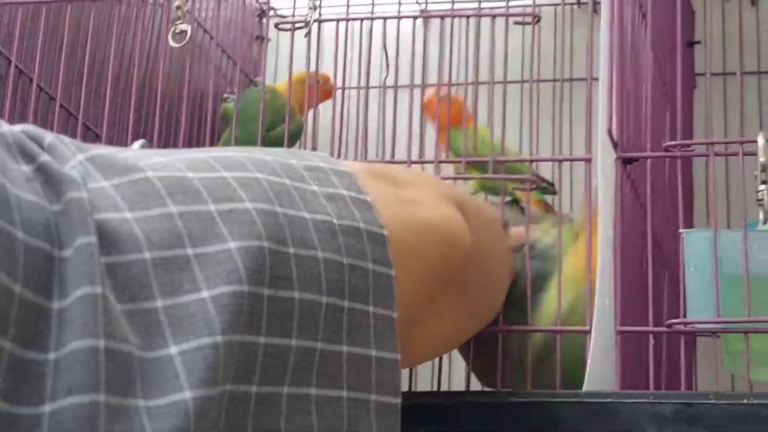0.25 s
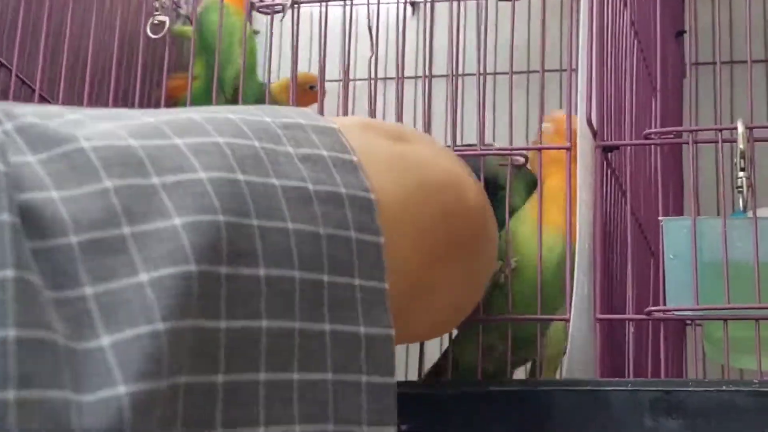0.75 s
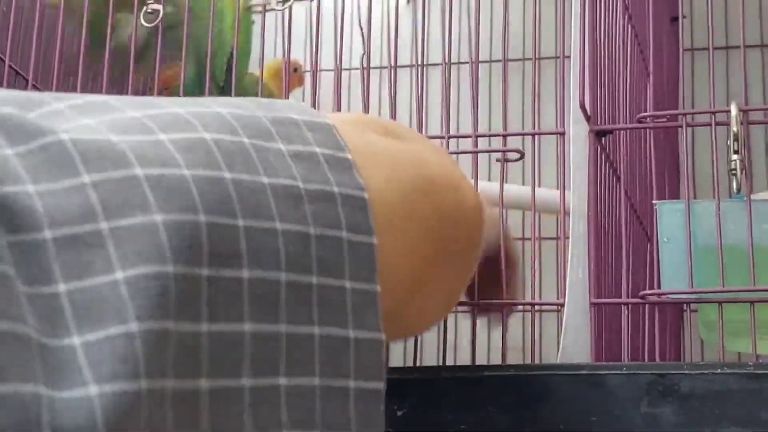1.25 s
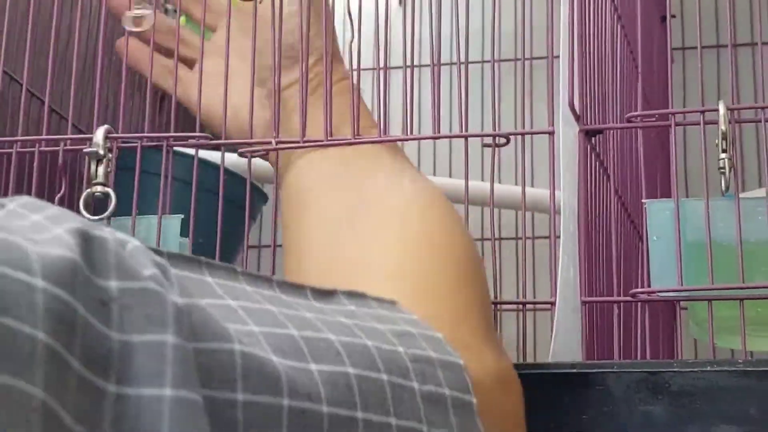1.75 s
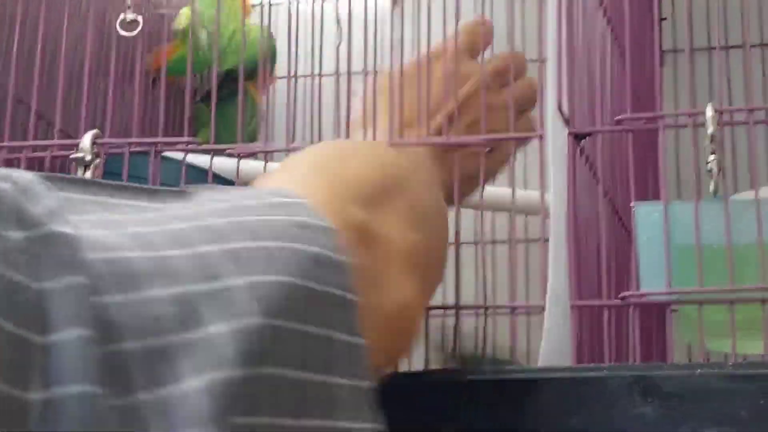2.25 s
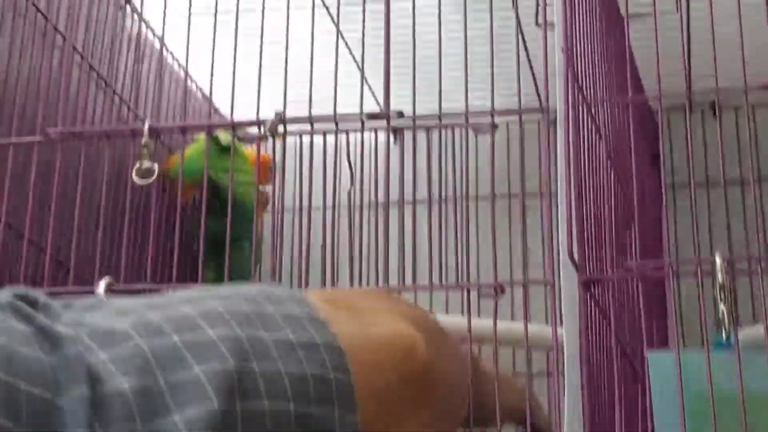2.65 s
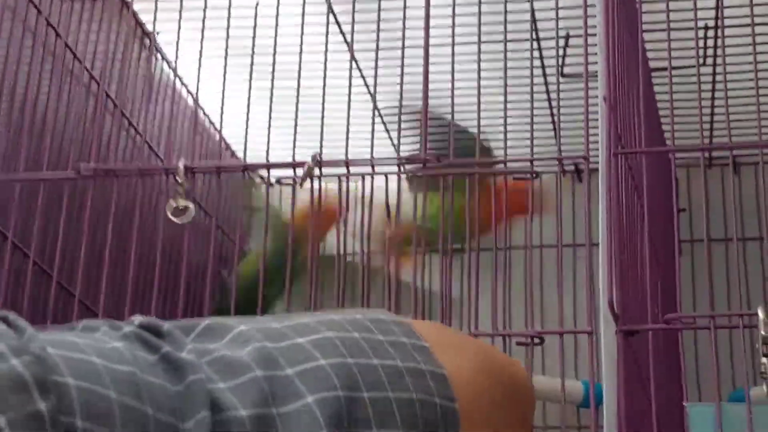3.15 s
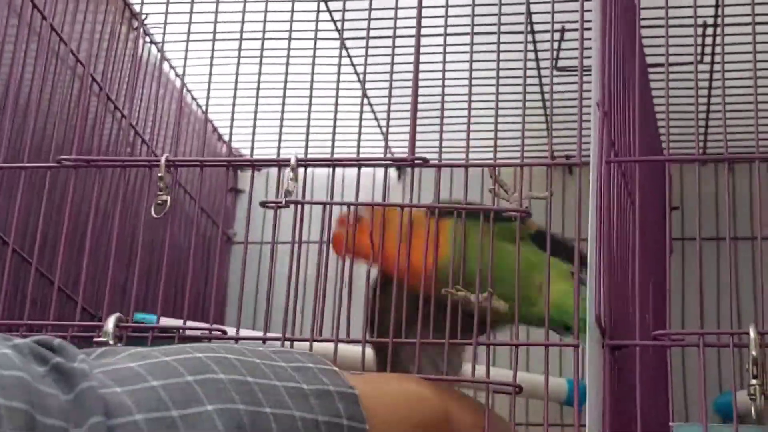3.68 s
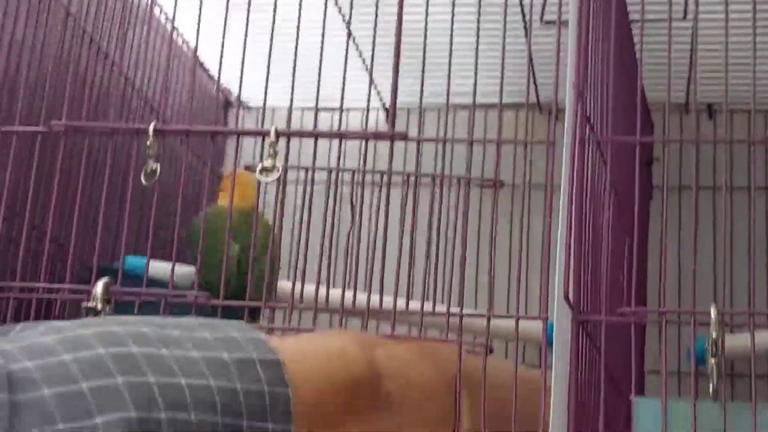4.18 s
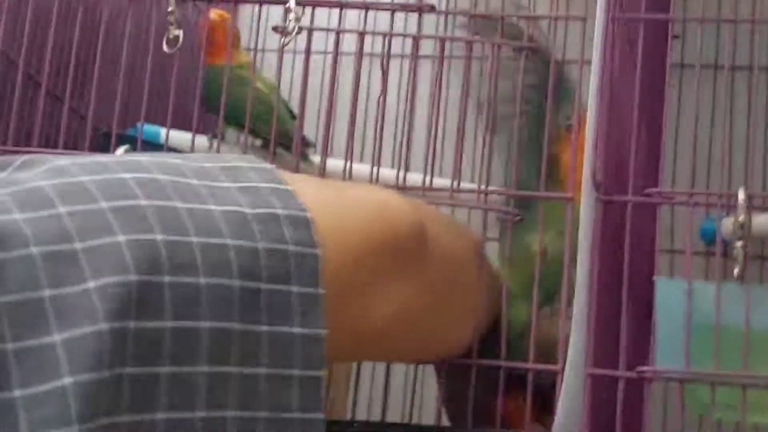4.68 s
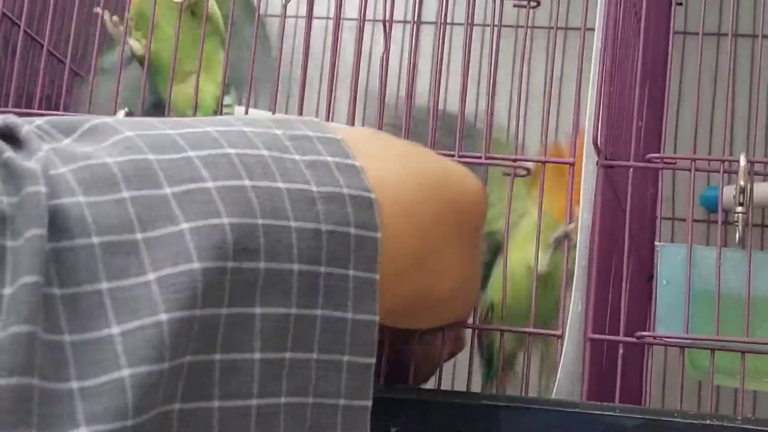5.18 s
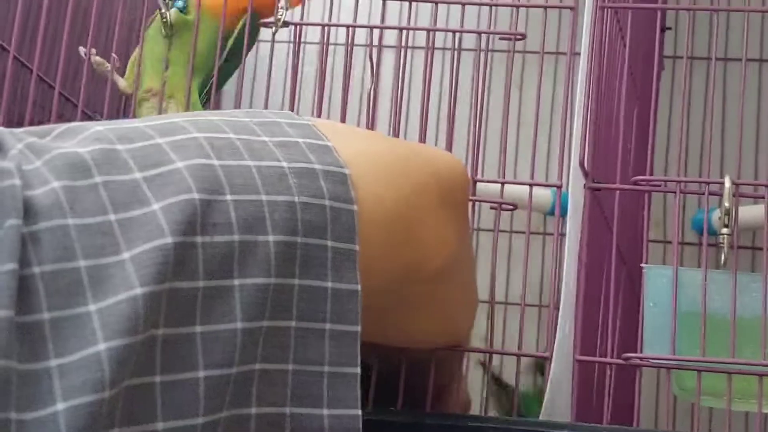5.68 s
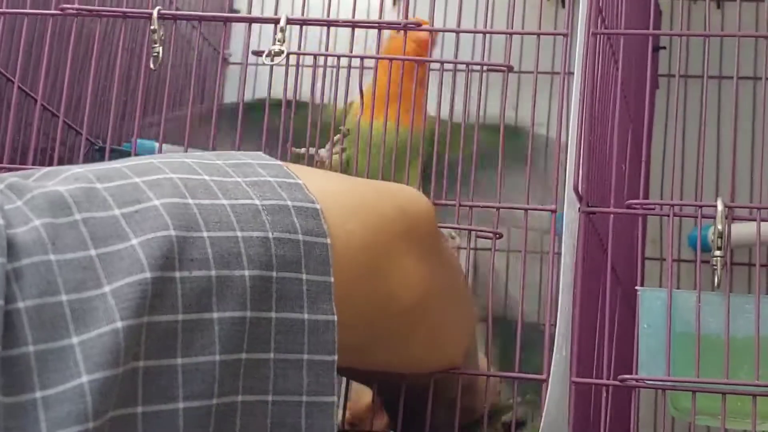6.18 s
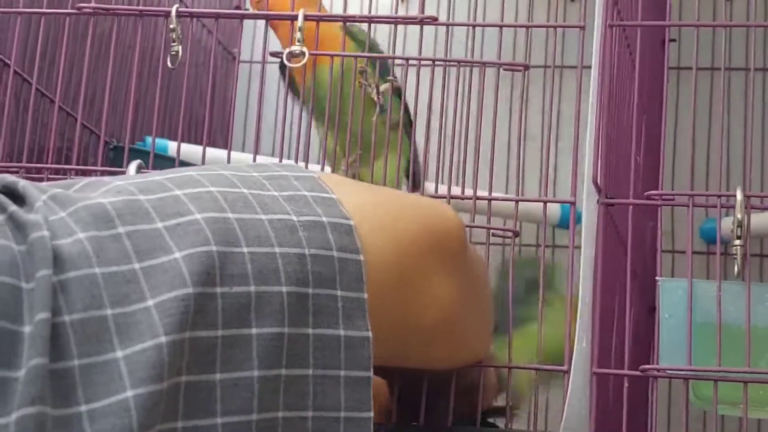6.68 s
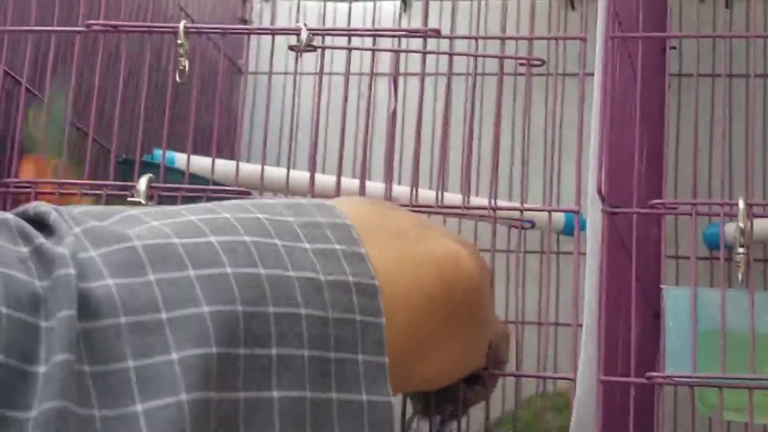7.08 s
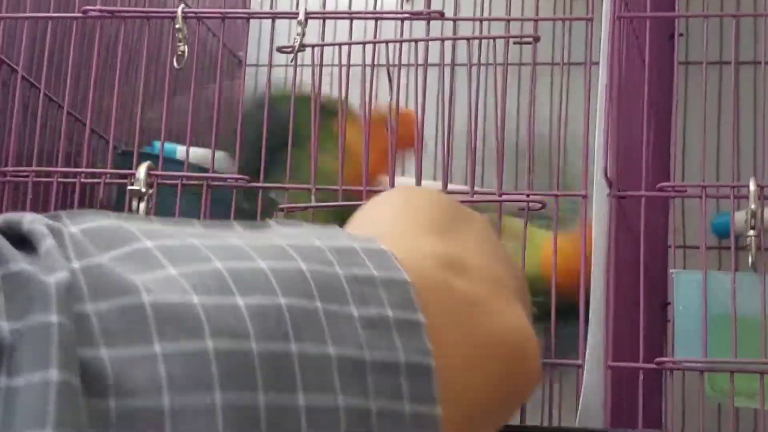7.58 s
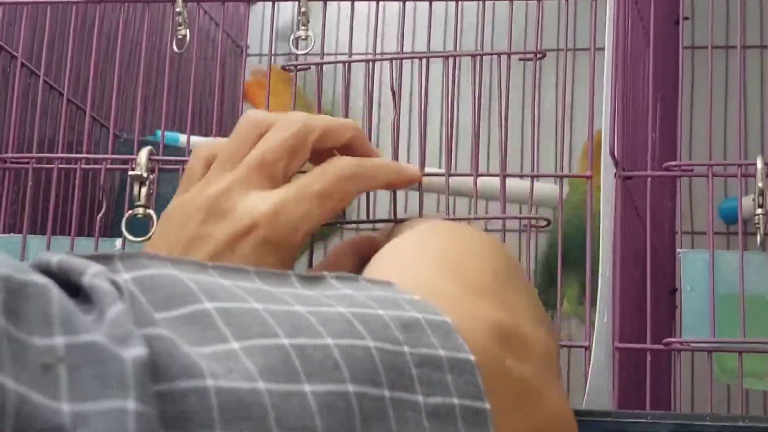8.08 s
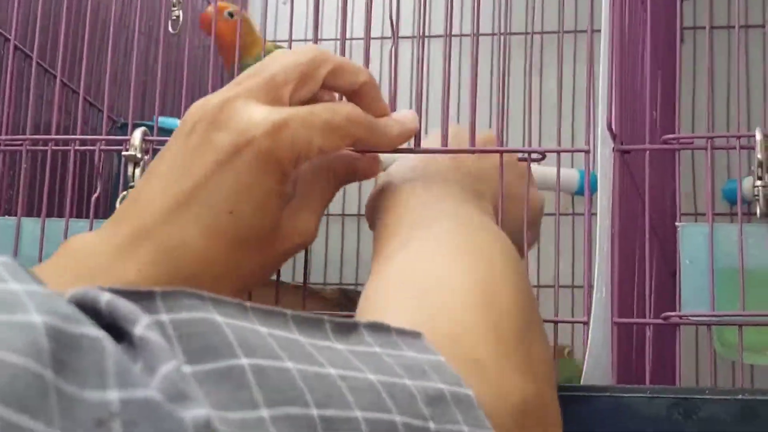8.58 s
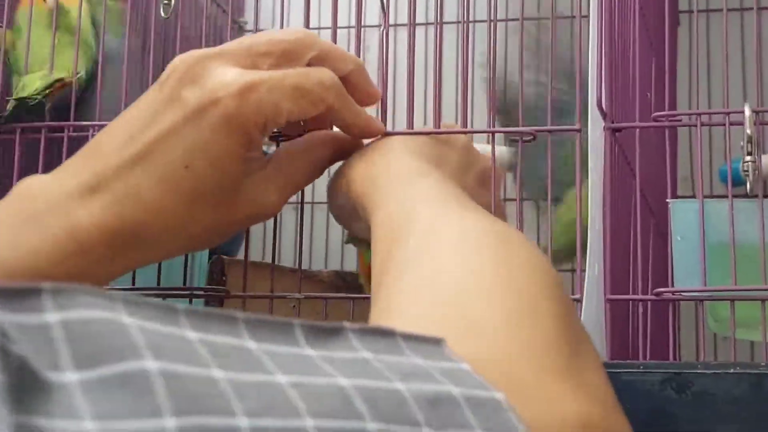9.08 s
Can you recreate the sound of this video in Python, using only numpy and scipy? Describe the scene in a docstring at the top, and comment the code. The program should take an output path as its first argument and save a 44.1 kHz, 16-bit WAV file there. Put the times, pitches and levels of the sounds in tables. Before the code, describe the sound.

Small parrots flap and screech in a wire cage for about nine seconds, heard close by in a small, hard room with brief reverberation. Wings flutter from the start in bursts of puffing air and feather rustle, strongest around 0, 3.2, 4.7, 6.3 and 7.7 seconds. Each screech is a short rasp breaking into a rising cry that drops off. They come irregularly at first, then about twice a second from 4.8 seconds to the end. Quick, high chirps cluster between 2.1 and 2.4 seconds, with single ones near 4 and 8.3. Wing tips brush the bars in rapid runs between 1.2 and 1.9 seconds and around 3.5. Claws, beaks and bodies strike the cage throughout with ticks, rattles and ringing thuds, sharpest near 4, 4.8, 6.3 and 6.8 seconds. Underneath, an engine idling outside hums low, fading after 4 seconds and returning faintly at the end.

```python
"""A small hard room, where lovebirds screech and flap about a wire cage as a hand tries to catch one.
Each call is a harmonic buzz of the syrinx, chopped into bursts and filtered by throat and beak.
Wings push puffs of air, rub their feathers and brush the bars; claws, beaks and bodies strike the
cage and excite its modes. All this reverberates briefly, over the hum of an engine idling outside."""
import sys
import numpy as np
from scipy import signal
from scipy.fft import rfft, irfft
from scipy.io import wavfile
from scipy.ndimage import uniform_filter1d

SR = 44100
rng = np.random.default_rng(int(sys.argv[2]) if len(sys.argv) > 2 else 0)


def unload_audio(sound):
    """Save the sound as a 16-bit wav file, at the path given as the first command line argument."""
    columns = np.transpose(np.atleast_2d(sound))
    # keep every value between -1 and 1, then stretch to whole-number steps
    steps = np.round(np.clip(columns, -1, 1) * 32767)
    wavfile.write(sys.argv[1], SR, steps.astype(np.int16))


N = 411894
TIME = np.arange(N) / SR

# firing rate of the engine: t/s, f/Hz
FIRING_RATE = [(1.4, 21.6), (3.2, 21.3), (4.3, 21.2), (9.3, 20.4)]
# loudness of the engine: t/s, level/dB
ENGINE_LEVEL = [(0, -36.5), (.8, -42), (1.2, -38), (3.72, -30.5), (4.39, -51.5), (9.05, -60), (9.34, -44)]
# exhaust orders: multiple of the firing rate, level/dB
EXHAUST_ORDERS = [(3, 0.5), (4, -21), (6, -11), (10, -15), (12, -24)]
# bouts of flapping: t/s, duration/s, air level/dB, feather level/dB
FLAP_BOUTS = [(0.011, 0.25, -34.5, -33.5), (.45, 0.17, -47.5, -48), (1.0, 0.54, -44.5, -46.5),
              (1.648, 0.67, -39, -39.5), (2.615, 0.048, -37.5, -36.5), (3.149, 0.49, -34.5, -34.5),
              (3.327, 0.047, -29, -30.5), (3.79, 0.35, -38.5, -39.5), (4.652, .38, -37, -36),
              (5.09, 0.46, -38.5, -37), (5.7, 0.66, -50.5, -45.5), (6.28, 0.77, -38.5, -37),
              (7.27, 0.27, -38.5, -37.5), (7.643, .19, -36.5, -36), (8.078, 0.082, -37.5, -31.5),
              (8.401, 0.21, -51.5, -49), (8.898, .22, -36.5, -37.5)]
# spectrum of pushed air and of thuds: f/Hz, level/dB
AIR_SPECTRUM = [(35, -15.5), (60, -24), (92, -6), (179, -4), (298, -3), (484, -6.5), (660, -11.5),
                (715, -17), (1500, -25.5), (1950, -58), (3300, -120)]
# spectrum of feather friction: f/Hz, level/dB
FEATHER_SPECTRUM = [(400, -1.5), (1000, -2), (2000, -1.5), (4500, -9), (7000, -11.5), (10000, -11.5),
                    (13000, -8.5), (16000, -8)]
# claws, beaks and bodies hitting the cage: t/s, tick level/dB, thud level/dB
IMPACTS = [(0.029, -28, -31), (.315, -32, -29.5), (0.651, -30.5, -42.5), (1.0368, -20, -31.5),
           (1.661, -24, -34.5), (2.0431, -21, -37), (2.267, -23, -44), (2.623, -26.5, -33),
           (3.8277, -18, -34.5), (3.994, -15, -29), (4.061, -36, -32.5), (4.244, -20.5, -31.5),
           (4.662, -30.5, -31), (4.792, -17, -27.5), (4.92, -25, -26), (5.3968, -20.5, -34),
           (6.085, -32, -51), (6.1579, -23, -41), (6.305, -16.5, -31.5), (6.76, -26, -31),
           (6.819, -17.5, -29.5), (7.407, -22.5, -31.5), (7.707, -20, -23), (8.101, -21, -34),
           (8.24, -21, -31), (8.83, -21, -32), (8.8828, -21.5, -36), (8.972, -19.5, -33)]
# spectrum of a tick on wire: f/Hz, level/dB
TICK_SPECTRUM = [(600, -4.5), (1500, -1.5), (4500, -5), (7000, -8), (12000, -7), (16000, -4)]
# modes of bars and tray: f/Hz, level/dB, T60/s
CAGE_MODES = [(223.4, -2.5, 0.43), (298, -8, 0.11), (487, -8, 0.081), (1010, -3.5, 0.13),
              (1845, 3.5, 0.087), (4280, -9.5, 0.18), (4840, -3.5, .1)]
# screeches: t/s, rasp/s, climb/s, drop/s, top f/Hz, end f/Hz, rasp level/dB, cry level/dB,
# roughness of the cry, treble gain/dB
SCREECH_CALLS = [ (.036, .034, 0.079, .033, 2862, 2595, -11, -12.5, 0.62, -2),
                 (0.334, .02, 0.098, 0.035, 3160, 2606, -20.5, -13, 0.77, -1),
                 (1.044, 0.0017, .044, 0.012, 2607, 2540, -24.5, -19, 0.67, -4),
                 (1.674, 0.027, 0.064, .038, 2796, 2150, -17, -15, 0.69, -1.5),
                 (2.61, .076, 0.078, 0.029, 3050, 2010, -17.5, -16, 0.53, 1),
                 (2.933, 0.055, 0.088, 0.042, 2877, 2567, -19.5, -15.5, 0.64, 0.5),
                 (3.218, 0.065, 0.088, 0.026, 2655, 1696, -20, -18, 1.04, 3),
                 (3.85, 0.041, 0.083, 0.035, 2545, 2014, -17, -14, 0.64, 1.5),
                 (4.849, 0.067, 0.058, 0.043, 2665, 2075, -14, -12, 0.71, -0.5),
                 (5.155, 0.025, 0.055, .03, 2478, 2108, -17, -14, 0.56, 0),
                 (5.423, .013, 0.057, 0.023, 2610, 2330, -19, -16, 0.59, -4),
                 (5.786, 0.058, 0.05, 0.036, 2790, 1650, -18, -14, 0.45, -0.5),
                 (6.318, 0.059, 0.069, 0.031, 2760, 2146, -17, -14, .35, -4.5),
                 (6.622, 0.0087, .042, 0.019, 2390, 2125, -14.5, -14.5, .85, -1.5),
                 (6.847, .04, .087, .018, 2786, 2290, -14.5, -12, .62, -2),
                 (7.164, .058, 0.051, 0.034, 2617, 2390, -18.5, -13, 0.6, -1.5),
                 (7.443, 0.029, 0.054, 0.031, 2614, 2420, -18, -13.5, 0.39, -1),
                 (7.845, 0.044, 0.036, 0.059, 2567, 2433, -19, -15, 0.35, -0.5),
                 (8.126, 0.049, .042, .024, 2490, 2077, -19, -15.5, .68, 1),
                 (9.004, 0.069, 0.065, 0.035, 2790, 1645, -15.5, -12, 0.51, -2),
                 (9.312, .06, 0.075, 0.026, 2700, 2200, -18.5, -15, .6, 2)]
# response of throat and open beak: f/Hz, gain/dB
VOCAL_TRACT = [(1000, -31), (1500, 0), (2200, -3), (2800, -1), (3400, 0.5), (4400, -0.5), (5500, -6),
               (6500, -14), (7800, -13), (9600, -17.5), (12500, -10), (16000, -33)]
# chirps: t/s, duration/s, start f/Hz, middle f/Hz, end f/Hz, level/dB, roughness
CHIRP_CALLS = [ (0.67, 0.019, 2750, 2950, 2890, -46, 0.3), (2.065, .03, 2660, 2914, 3130, -20, 0.62),
               (2.093, 0.046, 4060, 4760, 3960, -12, .2), (2.135, .015, 3160, 3140, 2890, -18, 0.2),
               (2.31, .052, 3494, 4416, 3460, -13.5, .28), (2.363, .035, 3280, 4043, 3980, -14.5, 0.23),
               (4.039, 0.028, 5140, 5640, 5600, -15.5, 0.2), (4.74, 0.019, 728, 745, 740, -30, .15),
               (8.254, 0.047, 6080, 6190, 6180, -16, 0.08)]
# wing tips brushing the bars: t/s, strokes, interval/s, level/dB
SLAP_RUNS = [(.985, 1, .06, -31), (1.159, 4, .062, -23.5), (1.497, 3, .065, -25), (1.819, 1, .06, -17.5),
             (1.9363, 1, .06, -26), (3.456, 5, .051, -17.5), (4.051, 1, .06, -14.5), (7.138, 1, .06, -20),
             (7.359, 1, .06, -19.5)]
# reverberation time of the room: f/Hz, T60/s
REVERB_TIME = [(150, 0.29), (1000, 0.32), (5000, 0.28), (14000, 0.26)]

STIR_AIR_DB, STIR_FEATHER_DB = -52, -56.5  # the birds never sit quite still


def amp(db):
    """Amplitude ratio of a level in dB."""
    return 10 ** (np.asarray(db) / 20)


def unit(x):
    """Scales to rms 1."""
    return x / np.sqrt(np.mean(x ** 2) + 1e-20)


def read(points, hz):
    """Interpolates on a log-frequency axis."""
    f, value = np.transpose(points)
    return np.interp(np.log(hz + 1), np.log(f), value)


def colour(x, points, size=2048):
    """Minimum-phase filter through points of f/Hz, gain/dB."""
    log_gain = np.log(amp(read(points, abs(np.fft.fftfreq(size, 1 / SR)))))
    taps = np.fft.ifft(np.exp(signal.hilbert(log_gain).conj())).real[:size // 2]
    filtered = signal.oaconvolve(np.atleast_2d(x), taps[None], axes=1)
    return filtered[:, :x.shape[-1]].reshape(x.shape)


def wobble(count, hz):
    """Low-pass noise of rms 1, up to about hz."""
    f = np.fft.rfftfreq(count, 1 / SR)
    return unit(irfft(rfft(rng.standard_normal(count)) / (1 + (f / hz) ** 4), count))


def pair(count, correlation):
    """Partially coherent noise in two channels."""
    shared = np.sqrt(correlation) * rng.standard_normal(count)
    return shared + np.sqrt(1 - correlation) * rng.standard_normal((2, count))


def add(mix, s, sound):
    """Superposes a stereo sound at time s."""
    part = mix[:, max(round(s * SR), 0):][:, :sound.shape[1]]
    part += sound[:, :part.shape[1]]


def engine(waver_db=1.3):
    """Periodic firing makes a harmonic series; only low exhaust orders pass the walls."""
    firing_hz = np.interp(TIME, *np.transpose(FIRING_RATE)) * (1 + 0.0127 * wobble(N, 6))
    cycles = np.cumsum(firing_hz) / SR
    hum = sum(amp(db + waver_db * wobble(N, 4)) * np.sin(2 * np.pi * (round(k) * cycles + rng.random()))
              for k, db in EXHAUST_ORDERS)
    return hum * amp(np.interp(TIME, *np.transpose(ENGINE_LEVEL))) * amp([[-1], [1]])


def hush(level_db=-47):
    """Stationary background noise, strongest near 100 Hz."""
    spectrum = [(25, -23.5), (100, 5.5), (350, -10), (700, -27), (2000, -31), (6000, -47.5), (16000, -44)]
    return amp(level_db) * unit(colour(pair(N, 1.0), spectrum))


def bouts(start, length, level_db, stir_db, attack_s=0.014, fade_db_per_s=58):
    """Envelope of flapping: each bout rises, holds and decays exponentially to a faint stirring."""
    s = TIME[::64]
    t = s[:, None] - start
    gain = np.clip(t / attack_s, 0, 1) * amp(level_db - fade_db_per_s * np.maximum(t - length, 0))
    return np.interp(TIME, s, np.maximum(gain.max(axis=1), amp(stir_db)))


def wings(beat_hz=15, air_depth_db=3, feather_depth_db=5, grain_db=-2):
    """Amplitude-modulated noise: each stroke displaces air and rubs the feathers together."""
    start, length, air_db, feather_db = np.transpose(FLAP_BOUTS)
    stroke = np.sin(2 * np.pi * np.cumsum(beat_hz * (1 + 0.192 * wobble(N, 4.16))) / SR)
    air = unit(colour(pair(N, 0.79), AIR_SPECTRUM) * amp(air_depth_db * stroke))
    air *= bouts(start, length, air_db, STIR_AIR_DB)
    friction = pair(N, 0.047) * amp(feather_depth_db * stroke + grain_db * wobble(N, 400))
    rustle = unit(colour(friction, FEATHER_SPECTRUM))
    return air + rustle * bouts(start, length, feather_db, STIR_FEATHER_DB)


def claws(ticks_per_s=10, gain_db=8.5, spread_db=4, decay_s=0.0037):
    """A Poisson process: claws tick on the wire at random, harder when the birds flap harder."""
    start, length, _, feather_db = np.transpose(FLAP_BOUTS)
    hits = (rng.random(N) < ticks_per_s / SR) * amp(gain_db + spread_db * (2 * rng.random(N) - 0.5))
    hits *= bouts(start, length, feather_db, STIR_FEATHER_DB)
    envelope = signal.lfilter([1], [1, -np.exp(-1 / (decay_s * SR))], hits + 1e-12)
    return colour(pair(N, 0.18) * envelope, TICK_SPECTRUM)


def knocks(tick_s=0.011, rattle_db=-13, rattle_s=0.11, rattles_per_s=500, thud_s=0.034, ring_db=-4):
    """Impact excitation: a blow ticks, rattles loose wires, thuds in the tray and rings damped modes."""
    out, t = np.zeros((2, N)), np.arange(SR // 2) / SR
    for s, tick_db, thud_db in IMPACTS:
        contacts = unit(1. * (rng.random(len(t)) < rattles_per_s / SR))
        rattle = amp(rattle_db) * contacts * np.exp(-t / rattle_s)
        tick = colour(pair(len(t), 0.23) * (np.exp(-t / tick_s) + rattle), TICK_SPECTRUM)
        ring = sum(amp(db - 60 * t / t60) * np.sin(2 * np.pi * hz * t) * np.tanh(2 * pair(1, 0.42))
                   for hz, db, t60 in CAGE_MODES)
        thud = unit(colour(pair(len(t), 0.78), AIR_SPECTRUM)) * np.exp(-t / thud_s)
        add(out, s, amp(tick_db) * tick + amp(thud_db) * (thud + amp(ring_db) * ring))
    return out


def voice(contour, treble_db, jitter, jitter_hz, shimmer, hiss_db, overtone_db, attack_s, release_s):
    """Source and filter: the syrinx buzzes in rapid bursts, and the vocal tract shapes the spectrum."""
    s, *columns = contour
    t = np.arange(s.min() - attack_s / 2, s.max() + release_s / 2, 1 / SR)
    hz, level_db, rough = (np.interp(t, s, c) for c in columns)
    rough, count = np.clip(rough, 0, 1), len(t)
    # a rough voice strays in pitch on four time scales
    shake = jitter * wobble(count, jitter_hz) + .053 * wobble(count, 340) + .036 * wobble(count, 95)
    hz *= 1 + rough * (shake + .025 * wobble(count, 60))
    phase = 2 * np.pi * np.cumsum(hz) / SR
    buzz = sum(amp(overtone_db * (k > 1)) * np.cos(k * phase) * (k * hz < SR / 2) for k in range(1, 11))
    burst_hz = 380 * (1 + .3 * wobble(count, 193))
    bursts = 1 + .85 * rough * np.cos(2 * np.pi * np.cumsum(burst_hz) / SR)
    hiss = colour(rng.standard_normal(count), [(4500, -21), (7500, -1.5)])  # air passing the beak
    call = colour((unit(buzz) + amp(hiss_db) * rough * hiss) * bursts, VOCAL_TRACT)
    call /= np.sqrt(uniform_filter1d(call ** 2, size=500) + 1e-9)  # loudness follows effort, not pitch
    call *= unit(np.exp(shimmer * np.tanh(wobble(count, 120))))
    call *= amp(level_db) * np.clip(np.minimum((t - t[0]) / attack_s, (t[-1] - t) / release_s), 0, 1)
    call = colour(call, [(5800, 0.02), (7800, treble_db)])  # brighter when the bird faces the listener
    lag = round(SR * .00028 * (2 * rng.random() - 1))  # unequal paths to the two microphones
    return t[0], echoes(np.array([np.roll(call, lag), call]))


def screech(start, rasp_s, climb_s, drop_s, top_hz, end_hz, rasp_db, cry_db, cry_rough, treble_db):
    """A register break: a low rasp swells, breaks into a climbing cry and drops off."""
    rasp_hz, break_hz, surge_s = 1530, 1700, 0.025
    cry_s = climb_s + drop_s
    t = np.linspace(-rasp_s, cry_s, 100)  # zero at the break
    climb = np.clip(t / climb_s, 0, 1) ** .75
    drop = np.clip((t - climb_s) / drop_s, 0, 1) ** 1.3
    creep_hz = np.interp(t, [-0.01552, 0], [rasp_hz, break_hz])
    hz = creep_hz + (top_hz - break_hz) * climb - (top_hz - end_hz) * drop
    level_db = np.interp(t, [-rasp_s, 0, surge_s, cry_s], [rasp_db - 5.5, rasp_db, cry_db, cry_db - 4])
    rough = np.interp(t, [0, surge_s], [.68, cry_rough])
    return voice((start + rasp_s + t, hz, level_db, rough), treble_db, jitter=0.01, jitter_hz=614,
                 shimmer=0.42, hiss_db=-11.5, overtone_db=9.5, attack_s=.016, release_s=0.0071)


def chirp(start, length, start_hz, middle_hz, end_hz, level_db, rough):
    """Frequency modulation along two half parabolas; the tone is stronger and rougher toward its ends."""
    u = np.linspace(-1, 1, 40)
    hz = middle_hz + (np.where(u < 0, start_hz, end_hz) - middle_hz) * u ** 2
    contour = start + length * (u + 1) / 2, hz, level_db + 3 * u ** 2, rough + 0.22 * u ** 2
    return voice(contour, treble_db=-7.5, jitter=0.038, jitter_hz=583,
                 shimmer=0.26, hiss_db=4.5, overtone_db=6, attack_s=.009, release_s=0.0096)


def slaps(rise_s=0.0035, decay_s=0.023, grain_db=3):
    """Friction noise: a wing tip sweeps the bars in a grainy swish, once a stroke."""
    out, t = np.zeros((2, N)), np.arange(SR // 8) / SR
    envelope = (1 - np.exp(-t / rise_s)) * np.exp(-t / decay_s)
    for start, count, gap, db in SLAP_RUNS:
        for k in range(round(count)):
            swish = pair(len(t), 0.16) * amp(grain_db * wobble(len(t), 600)) * envelope
            add(out, start + k * gap - rise_s / 2, amp(db) * colour(swish, FEATHER_SPECTRUM))
    return out


def echoes(x, count=14, level_db=1, span_s=.012):
    """Early reflections from tray and walls comb-filter each channel; total energy is preserved."""
    taps = np.zeros((2, SR // 40))
    taps[:, 0] = 1
    for side in taps:
        delays = 1 + (SR * span_s * rng.random(count)).astype(int)
        side[delays] += amp(level_db) * rng.choice([-1, 1], count) / np.sqrt(count)
    heard = signal.fftconvolve(x, taps, axes=1)
    return heard * np.linalg.norm(x) / np.linalg.norm(heard)


def room(x, tail_db=-7.5, build_up_s=0.00065):
    """Reverberation: the diffuse field decays exponentially, fastest in the treble."""
    hz, t, noise = signal.stft(rng.standard_normal((2, SR * 2 // 3)), SR, nperseg=256)
    envelope = amp(-60 * t / read(REVERB_TIME, hz)[:, None]) * (1 - np.exp(-t / build_up_s))
    tail = signal.istft(noise * envelope, SR, nperseg=256)[1]
    return x + signal.fftconvolve(x, amp(tail_db) * tail / np.linalg.norm(tail[0]), axes=1)[:, :N]


def scene():
    """Superposition: birds and cage reverberate in the room, over the engine and the hush."""
    background = hush()
    calls = np.zeros((2, N))
    for row in SCREECH_CALLS:
        add(calls, *screech(*row))
    for row in CHIRP_CALLS:
        add(calls, *chirp(*row))
    return room(calls + wings() + slaps() + knocks() + claws()) + engine() + background


def record(dry, ceiling=.92, cutoff_hz=15900):
    """Transduction: a slightly duller left microphone, soft saturation of peaks, then a band limit."""
    left = colour(dry[0], [(5000, -0.55), (8000, -1.5), (12000, -2.5)])
    heard = np.array([left, dry[1]])
    heard /= (1 + (heard / ceiling) ** 8) ** (1 / 8)
    low_pass = signal.firwin(401, cutoff_hz, window=("kaiser", 8), fs=SR)
    return signal.oaconvolve(heard, low_pass[None], "same")


dry = scene()
out = record(dry)
unload_audio(out)
```